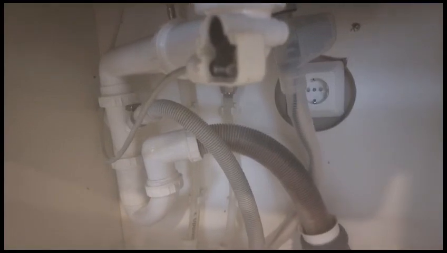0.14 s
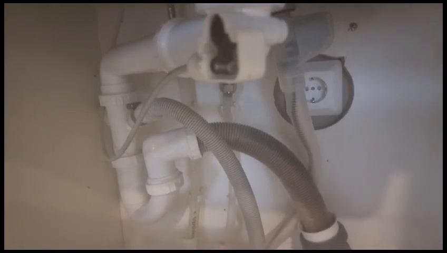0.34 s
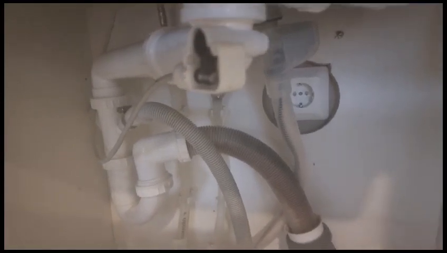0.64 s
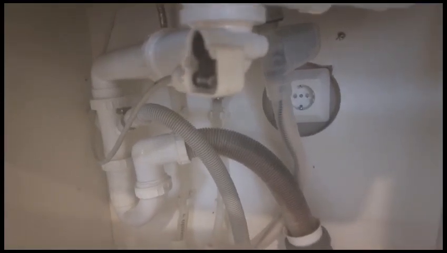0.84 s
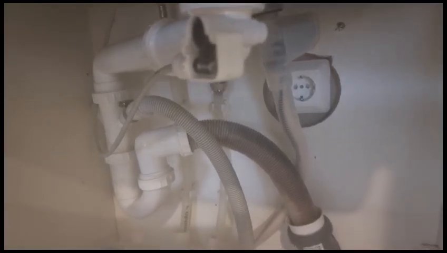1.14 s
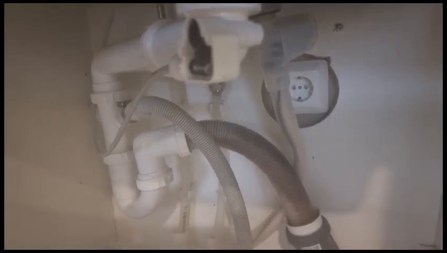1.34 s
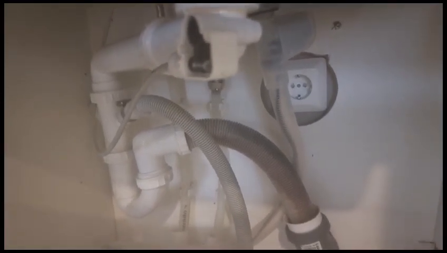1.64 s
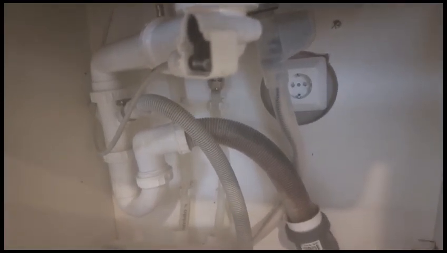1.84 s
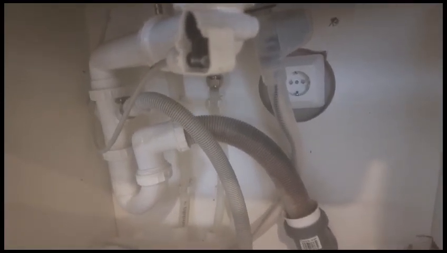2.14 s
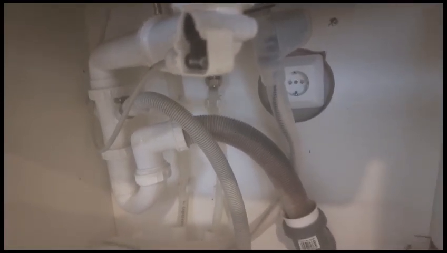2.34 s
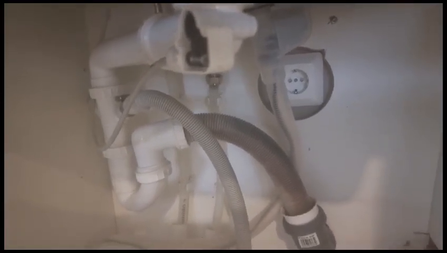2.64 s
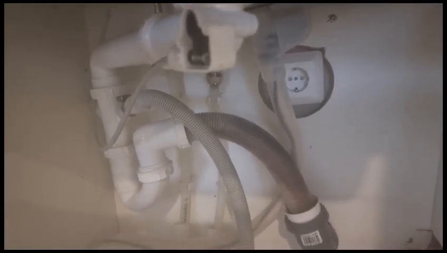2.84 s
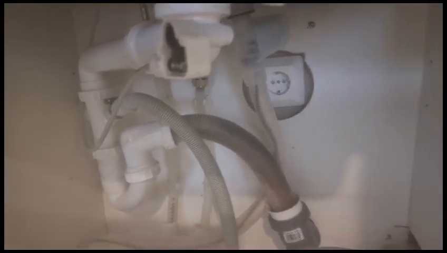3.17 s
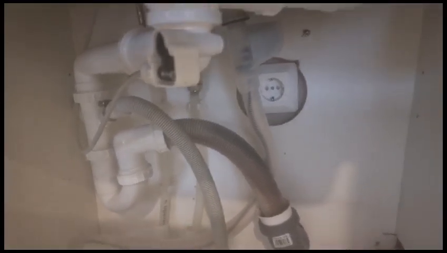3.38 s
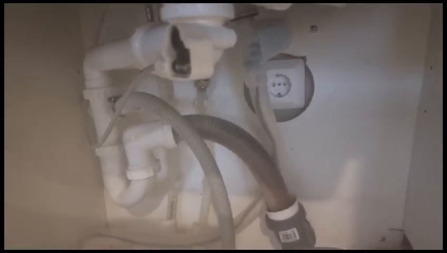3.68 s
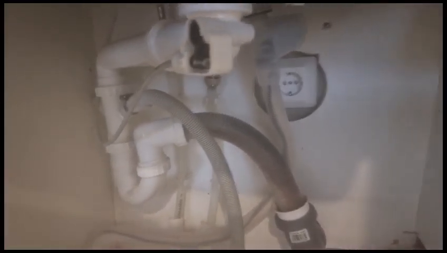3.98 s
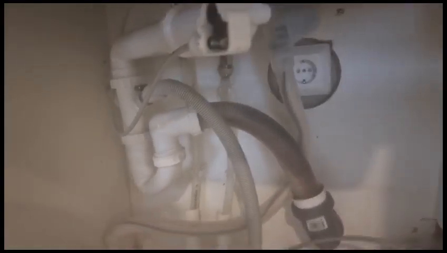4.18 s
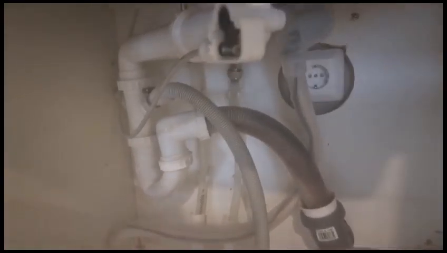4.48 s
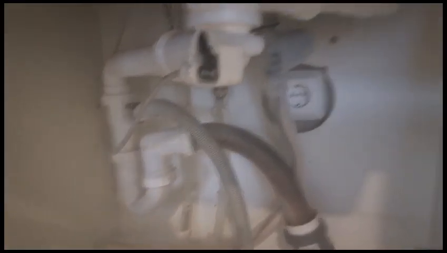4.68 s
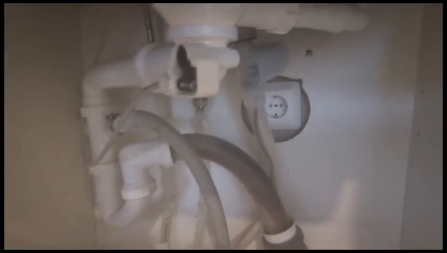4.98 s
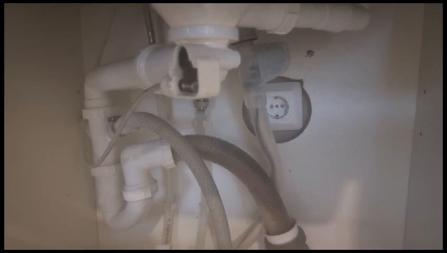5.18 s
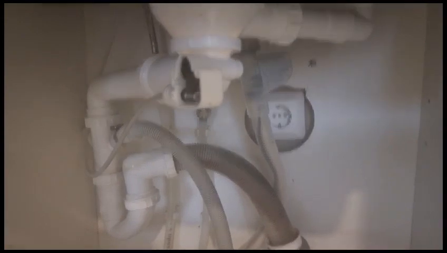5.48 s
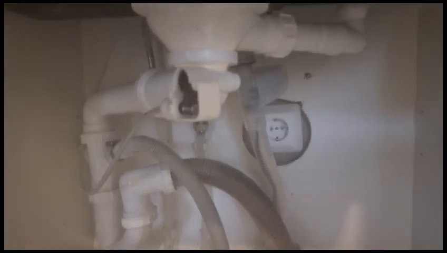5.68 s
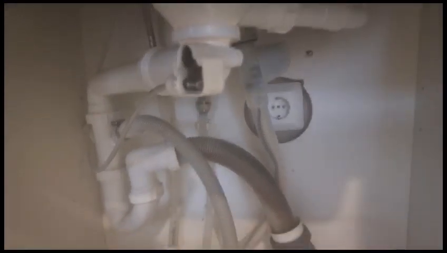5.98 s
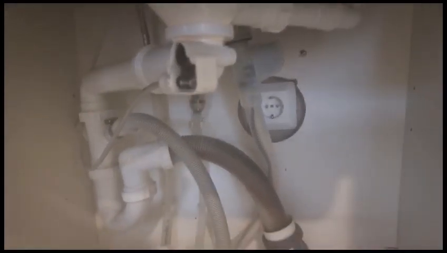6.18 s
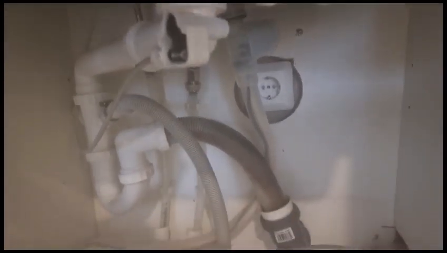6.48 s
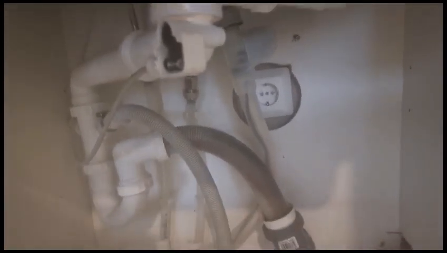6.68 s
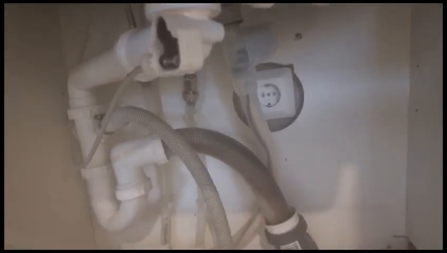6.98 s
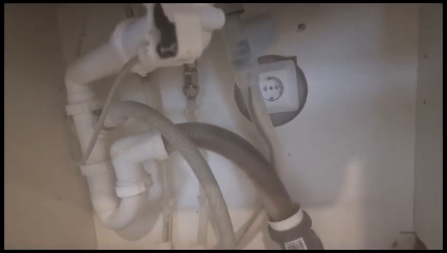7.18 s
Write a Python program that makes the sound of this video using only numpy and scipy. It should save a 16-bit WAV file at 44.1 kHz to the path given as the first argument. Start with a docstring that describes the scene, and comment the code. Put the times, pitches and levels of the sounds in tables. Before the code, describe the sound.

From 0 to about 2.7 seconds, tap water runs steadily: a loud, bright hiss on the basin overhead, with hollow pipe resonance and low rumble, heard closely in stereo inside a boxy cupboard. A raspy slurp begins around 2.6. The stream fades from 2.7 and is practically gone just after 3.0, while five quick, deep gulps throb between 2.8 and 2.95. A swell of run-off follows, gurgling unevenly, with hollow glugs around 3.1, 3.4, 3.8, 4.1 and 4.4, fine trickling and sharp drips on plastic. A dull knock and low gulp come at 4.5. The gurgle ebbs from 4.6; trickling breaks up after 5.7. Small resonant plops sound at 5.87 and 6.07. After 6.4 the pipe is nearly dry, leaving scattered tiny ticks, faint knocks near 6.6, and quiet room tone with a barely audible hum until about 7.3.

```python
"""Tap water rushes and rumbles into a sink and its plastic drain, heard from the cupboard below.
The tap closes, the drain slurps and gulps air, and the run-off gurgles away, thinning to drips and plops.
Rush, rumble, wash and slurp are coloured noise; gulps, bubbles and plops are decaying tones;
droplets, drops and knocks are short noise bursts. Dense reflections add a short, boxy ring."""
import sys
import numpy as np
from scipy import signal
from scipy.fft import rfft, irfft
from scipy.io import wavfile

SR = 44100
rng = np.random.default_rng(int(sys.argv[2]) if len(sys.argv) > 2 else 0)


def pcm_store(signal):
    """Save signal as 16-bit PCM."""
    levels = np.round(np.clip(np.atleast_2d(signal), -1, 1) * 32767)
    wavfile.write(sys.argv[1], SR, levels.astype(np.int16).T)


N = 322812
T = np.arange(N) / SR
FREQS = np.maximum(np.arange(N // 2 + 1) * SR / N, 1)
GRAIN_T = np.arange(4096) / SR  # time within one short sound

# relative colour of the stream on the basin: f/Hz, level/dB
JET_COLOUR = [(40, -47), (150, -26), (230, -10.5), (450, -5), (700, -12), (1050, -12), (1450, -10),
              (2000, -3.5), (3600, -4.5), (5200, -2), (6500, 1.5), (7500, -1.5), (8600, -10), (11500, -8.5),
              (15500, -6.5)]
# relative colour of basin and pipe shaken by falling water: f/Hz, level/dB
RUMBLE_COLOUR = [(22, -56), (42, -29), (58, -11.5), (85, -9), (118, 3.5), (148, -8), (175, -5), (230, -19),
                 (400, -41)]
# relative colour of water rocking in the trap: f/Hz, level/dB
SLOSH_COLOUR = [(25, -30), (42, -11), (62, -8.5), (78, -1.5), (94, 2.5), (116, -2), (145, -13.5),
                (230, -21.5), (400, -40)]
# relative colour of water and bubbles in the pipe: f/Hz, level/dB
GURGLE_COLOUR = [(150, -25), (300, 1), (450, -9.5), (700, -10), (1100, -2.5), (1500, -3.5), (2000, -3),
                 (2800, -7), (4000, -5), (9000, -35)]
# relative colour of droplets at the strainer: f/Hz, level/dB
TRICKLE_COLOUR = [(1000, -55), (2600, -10.5), (3500, -5), (4200, -4.5), (5200, -2.5), (6500, 0.5),
                  (7600, -5), (8700, -14), (10500, -11.5), (12000, -13), (13500, -8), (15500, -14)]
# relative colour of the quiet kitchen: f/Hz, level/dB
ROOM_COLOUR = [(25, -7), (70, 3.5), (160, -10.5), (250, -14.5), (360, -13.5), (500, -19.5), (1000, -37),
               (1600, -30), (2600, -35), (15000, -30.5)]
# relative colour of the sucked air: f/Hz, level/dB
SLURP_COLOUR = [(100, -7), (200, 8), (300, 12), (460, 1), (800, -8), (1500, -37), (4000, -26)]
# relative colour of the knocks: f/Hz, level/dB
KNOCK_COLOUR = [(30, 6), (70, 12), (160, 3), (400, -17), (900, -19), (1700, -15), (3000, -30), (8000, -60)]
# air modes of the drain: f/Hz, width/Hz, strength in jet and slurp/dB, strength in gurgle/dB
PIPE_MODES = [(289.5, 20, 5.5, -15), (370.2, 9, 10.5, 9.5), (536, 42, 7, 9), (763, 69, 8.5, 4),
              (1179, 72, 4.5, -19), (3140, 12, 4.5, -15), (6200, 160, -15, -12)]
# slugs of water that swell the run-off as they pass down the pipe: t/s, lift/dB, half length/s
SLUGS = [(2.97, 13.5, 0.14), (4.056, 7.5, 0.057), (4.68, 5.5, 0.065)]
# air sucked down as the tap closes: t/s, level/dB, half length/s
SLURPS = [(2.583, -41.5, 0.071), (2.792, -45, 0.018), (2.876, -42, 0.021)]
# the largest bubbles: t/s, level/dB, f/Hz
BUBBLES = [(2.595, -28, 470), (2.862, -32.5, 460), (3.115, -33, 1870), (3.118, -28.5, 1060),
           (3.122, -32.5, 540), (3.419, -25.5, 1130), (3.565, -31.5, 1930), (3.72, -37.5, 545),
           (3.794, -30.5, 1820), (4.082, -30, 903), (4.318, -31, 1060), (4.382, -27, 960),
           (4.582, -34.5, 970), (4.629, -34, 1700), (4.675, -32.5, 880), (5.005, -38.5, 1900),
           (5.226, -39, 548), (6.632, -50, 1600)]
# air gulped through the trap: t/s, level/dB, f/Hz
GULPS = [(2.793, -16.5, 90.5), (2.828, -18.5, 90), (2.867, -18, 97), (2.900, -21, 102), (2.942, -25, 95),
         (4.502, -38, 64.5), (6.19, -46, 97), (6.583, -53, 122), (6.633, -48.5, 81.4), (6.98, -44.5, 102)]
# drops that stand out as they slap the plastic: t/s, level/dB, brightest f/Hz
DROPS = [(3.2271, -27, 6600), (3.3182, -24, 6350), (3.341, -26.5, 4960), (3.476, -23.5, 5300),
         (3.5663, -28, 6450), (3.941, -30.5, 5640), (4.295, -29.5, 4900), (4.38, -35, 4260),
         (4.6835, -21, 6000), (5.029, -32, 5150), (5.1565, -37, 6700), (5.783, -36, 5890),
         (5.87, -36, 5800), (5.893, -37, 7000), (6.008, -45, 3740), (6.075, -41, 7300),
         (6.097, -37.5, 5800), (6.136, -40, 6160), (6.177, -36, 6400), (6.196, -38, 4630),
         (6.206, -38, 6300), (6.3121, -40, 6300), (6.413, -49, 8500), (6.51, -45, 7500),
         (6.584, -41.5, 3670), (6.647, -33.5, 6160), (6.6967, -44, 7760), (6.754, -46, 12000),
         (6.86, -51, 9500), (6.904, -47, 8500), (6.9516, -50, 12500), (6.984, -38.5, 6550),
         (7.047, -46.5, 6940), (7.1427, -47.5, 6000), (7.182, -45, 7800), (7.201, -39.5, 5290)]
# the pipe knocks as water shifts in it: t/s, level/dB
KNOCKS = [(4.505, -33), (6.588, -46), (6.633, -38)]
# heavy drips into the trap: t/s, level/dB
PLOPS = [(5.868, -36.5), (6.068, -37.5)]
# ringing modes of the hollow trap: f/Hz, relative level/dB, t60/s
TRAP_MODES = [(536, -5, 0.098), (603, 4.5, 0.06), (740, 0, 0.043), (993, 1, 0.073), (1396, -18, 0.6),
              (1455, 2, 0.057), (1770, -22, 0.043), (2420, -12, .1)]
# difference in colour between the two listening ports: f/Hz, left minus right level/dB
PORTS = [(60, -2), (380, -1), (700, -0.5), (1290, -5.5), (2380, -1.8), (4400, 6), (8120, -3), (15000, 1)]

# the tap runs steadily, is turned down, then shuts and the last of the stream falls
JET_DB, TAP_TURN_S, TURN_DB_PER_S = -27.7, 2.712, 41
TAP_SHUT_S, SHUT_DB_PER_S = 2.976, 75
# the pipe runs full, ebbs, then runs dry
EBB_S, EBB_DB_PER_S, DRY_S, DRY_DB_PER_S = 4.63, 11.5, 6.38, 107
# the basin's last water thins slowly, then breaks up into a dribble
TRICKLE_DB, THIN_DB_PER_S, BREAK_S, BREAK_DB_PER_S, DRIBBLE_DB = -45, 1.2, 5.7, 38, -64


def amp(db):
    """Decibels to gain."""
    return 10 ** (np.asarray(db) / 20)


def unit(x):
    """Scale to an rms of one."""
    return x / np.sqrt(np.mean(x ** 2))


def shape(points):
    """Gain at every frequency, drawn through (Hz, dB) points on a log pitch scale."""
    hz, db = np.transpose(points)
    return amp(np.interp(np.log(FREQS), np.log(hz), db))


def colour(x, gain):
    """Filter by a frequency response, then scale to an rms of one."""
    return unit(irfft(rfft(x) * gain, N))


def resonance(hz, width):
    """Response of one damped mode."""
    return 1 / (1 + 1j * (FREQS ** 2 - hz ** 2) / (FREQS * width))


def pipe(axis):
    """The drain's air modes add their power to a flat response; axis picks the strength column."""
    power = sum(np.abs(amp(row[axis]) * resonance(row[0], row[1])) ** 2 for row in PIPE_MODES)
    return np.sqrt(1 + 2 * power)


def walk(rate):
    """Smooth random wander with an rms of one, mostly slower than rate in Hz."""
    return colour(rng.standard_normal(N), 1 / (1 + (FREQS / rate) ** 4))


def air(apart_hz):
    """Stereo noise, nearly alike left and right far below apart_hz."""
    mid, side = rng.standard_normal((2, N))
    side = irfft(rfft(side) * np.minimum(0.046 + FREQS / apart_hz, 1), N)
    return np.array([mid + side, mid - side])


def add(track, s, sound):
    """Mix a short sound in at time s."""
    start = int(np.clip(s * SR, 0, N - 1))
    track[start:start + len(sound)] += sound[:N - start]


def cupboard(x, wet_db, t60, lag=0.00043):
    """Direct sound, lag seconds late at the left port, plus dense reflections that differ for each port."""
    t = np.arange(SR // 4) / SR
    tail = rng.standard_normal((2, len(t))) * amp(-60 * t / t60) * (1 - np.exp(-t / 0.0021))
    tail *= amp(wet_db) / np.sqrt(np.sum(tail ** 2, axis=1, keepdims=True))
    left = np.pad(x, (int(lag * SR), 0))[:N]
    return np.array([left, x]) + signal.fftconvolve(x[None], tail, axes=1)[:, :N]


def bubble(hz, cycles, glide):
    """A pinched-off bubble rings for a few cycles and rises in pitch, peak one."""
    age = GRAIN_T * hz / cycles
    tone = np.sin(2 * np.pi * hz * GRAIN_T * (1 + glide * np.minimum(age, 4)))
    ring = tone * np.exp(-age) * (1 - np.exp(-2 * age))
    return ring / np.abs(ring).max()


def splash(hz, sharpness, decay):
    """A decaying burst of spray centred on one pitch, peak one."""
    burst = rng.standard_normal(len(GRAIN_T)) * np.exp(-GRAIN_T / decay)
    band = signal.iirpeak(hz, sharpness, SR)
    burst = signal.lfilter(*band, signal.lfilter(*band, burst))
    return burst / np.abs(burst).max()


def since(s):
    """Seconds gone by since time s; zero before it."""
    return np.maximum(T - s, 0)


def swell(s, half_length):
    """A smooth rise and fall around time s, peak one."""
    return np.exp(-((T - s) / half_length) ** 2)


def slugs():
    """Lift in dB from the slugs of water passing."""
    return sum(db * swell(s, half_length) for s, db, half_length in SLUGS)


def pipe_flow(empty_db=-31):
    """Flow down the pipe in dB below full: it holds, ebbs, then drops to a last seep."""
    return np.maximum(-EBB_DB_PER_S * since(EBB_S) - DRY_DB_PER_S * since(DRY_S), empty_db)


def strainer_flow(running_db=5):
    """Trickle level in dB: stronger under the running tap, then thinning until it breaks into a dribble."""
    thinning = TRICKLE_DB - THIN_DB_PER_S * since(TAP_SHUT_S) - BREAK_DB_PER_S * since(BREAK_S)
    return np.maximum(thinning, DRIBBLE_DB) + running_db * amp(-SHUT_DB_PER_S * since(TAP_SHUT_S))


def scatter(count, level, low_hz, high_hz, spread_db):
    """Random (s, dB, Hz) events after the tap shuts, up to spread_db below a level curve."""
    when, size, pitch = rng.random((count, 3)).T
    s = TAP_SHUT_S + (T[-1] - TAP_SHUT_S) * when
    db = np.interp(s, T, level) - spread_db * size
    return list(zip(s, db, low_hz * (high_hz / low_hz) ** pitch))


def jet(flutter_db=0.52, spray_db=0.44):
    """The stream hisses on the basin overhead and sounds the drain's modes, fading as the tap closes."""
    db = JET_DB - TURN_DB_PER_S * since(TAP_TURN_S) - SHUT_DB_PER_S * since(TAP_SHUT_S)
    hiss = air(1600) + 0.5 * cupboard(rng.standard_normal(N), wet_db=3, t60=0.14, lag=0)
    hiss = hiss * amp(flutter_db * walk(14) + spray_db * walk(150))
    return colour(hiss, shape(JET_COLOUR) * pipe(axis=2)) * amp(db)


def rumble(shut_s=2.78, fade_s=0.053, flowing_db=-38.5, slosh_db=-53, follow=0.78, still_db=-66):
    """Falling water shakes basin and pipe; then it sloshes lower in the trap, calming as the pipe empties."""
    full = np.clip((shut_s - T) / fade_s, 0, 1)
    flowing = colour(air(2000), shape(RUMBLE_COLOUR)) * amp(flowing_db)
    slosh_level = np.maximum(slosh_db + follow * pipe_flow() + slugs(), still_db)
    sloshing = colour(air(540), shape(SLOSH_COLOUR)) * amp(slosh_level)
    return full * flowing + (1 - full) * sloshing


def gurgle(count=3000, spread_db=3, bubbles_db=-1, wash_db=-4, surge_db=3, full_db=-49.5, slug_share=0.29):
    """A swarm of small bubbles over the wash of water down the pipe wall, coming in surges."""
    swarm = np.zeros(N)
    for when, pitch, size in rng.random((count, 3)):
        gain = amp(-spread_db * np.log(size + 0.019))
        add(swarm, when * N / SR, gain * bubble(450 * 7 ** pitch, cycles=2, glide=0.039))
    swarm = unit(cupboard(swarm, wet_db=1.5, t60=0.14))
    body = shape(GURGLE_COLOUR) * pipe(axis=3)
    # small bubbles ring more briefly, so the swarm is tilted upwards to give them their share
    bubbles = amp(bubbles_db) * colour(swarm, body * np.sqrt(FREQS))
    wash = amp(wash_db) * colour(air(2100), body)
    return (bubbles + wash) * amp(full_db + pipe_flow() + slug_share * slugs() + surge_db * walk(19.4))


def trickle(count=3200, spread_db=5.5, fizz_db=-6, full_db=-49, thin_lift_db=9, thin_rise_hz=2500, spurt_db=3):
    """Droplets spatter at the strainer; as the flow thins they come fewer, finer and in spurts."""
    db = strainer_flow()
    flow = np.clip(amp(db - full_db), 0.1, 1)
    spatter = np.zeros(N)
    for when, pitch, size, chance in rng.random((count, 4)):
        here = flow[int(when * N)]
        if chance >= here:
            continue
        lowest_hz = 2600 + thin_rise_hz * (1 - here)
        droplet = splash(lowest_hz + (14700 - lowest_hz) * pitch, sharpness=1.5, decay=0.00038)
        # a thin flow favours the high droplets
        gain_db = -spread_db * np.log(size + 0.03) + thin_lift_db * (0.5 - here) * pitch
        add(spatter, when * N / SR, amp(gain_db) / np.sqrt(here) * droplet)
    body = shape(TRICKLE_COLOUR)
    splashes = colour(cupboard(spatter, wet_db=7, t60=0.063), body)
    fizz = amp(fizz_db) * colour(air(1200), body)
    return (splashes + fizz) * amp(db + spurt_db * (1 - flow) * walk(16))


def room(room_db=-66, hum_hz=361, hum_db=-80, waver_hz=3):
    """Quiet kitchen noise with a faint hum whose pitch wavers."""
    hum = np.sqrt(2) * np.sin(2 * np.pi * np.cumsum(hum_hz + waver_hz * walk(9.9)) / SR)
    return amp(room_db) * colour(air(830), shape(ROOM_COLOUR)) + amp(hum_db) * hum


def slurp(ragged_db=3):
    """Air dragged down with the last full flow rasps in the pipe's low modes."""
    suction = sum(amp(db) * swell(s, half_length) for s, db, half_length in SLURPS)
    rasp = air(1000) * amp(ragged_db * walk(54))
    return colour(rasp, shape(SLURP_COLOUR) * pipe(axis=2)) * suction


def large_bubbles(bubble_db=-3, burst_db=-10, small_db=-35):
    """Single glugs that stand out of the gurgle, each with a wet burst as the film breaks."""
    out = np.zeros(N)
    smaller = scatter(count=44, level=small_db + pipe_flow(), low_hz=522, high_hz=2640, spread_db=6)
    for s, db, hz in BUBBLES + smaller:
        glug = bubble(hz, cycles=3, glide=0.0075)
        burst = splash(1.15 * hz, sharpness=1.2, decay=0.006)
        add(out, s, amp(db + bubble_db) * glug + amp(db + burst_db) * burst)
    return cupboard(out, wet_db=-3.5, t60=0.073)


def gulps(swell_s=0.013, decay_s=0.0077, lowest_hz=42):
    """Slugs of water swing on the air in the trap: short, nearly pure low throbs."""
    out, t = np.zeros(N), np.arange(SR // 5) / SR
    rise = np.sin(np.pi / 2 * np.minimum(t / swell_s, 1)) ** 2
    envelope = rise / np.cosh(np.maximum(t - swell_s, 0) / decay_s)
    for s, db, hz in GULPS:
        add(out, s, -amp(db) * envelope * np.sin(2 * np.pi * hz * t))
    # cut the deepest bass but keep the overall level
    return colour(out, 1 / (1 + (lowest_hz / FREQS) ** 6)) * out.std()


def drops(spray_db=-50, spray_follow=0.42, ring_db=-3, small_db=-35):
    """Drops slap the plastic: a sharp tick, a brief pitched ring and a crack of spray; lighter ones at random."""
    out = np.zeros(N)
    light_level = small_db + strainer_flow() - TRICKLE_DB
    light = scatter(count=48, level=light_level, low_hz=4140, high_hz=10100, spread_db=4)
    for s, db, hz in DROPS + light:
        tick = splash(hz, sharpness=1.9, decay=0.0012)
        tick += amp(ring_db) * splash(hz, sharpness=5.9, decay=0.0024)
        crack = splash(14700, sharpness=1.6, decay=0.0023)
        crack_db = spray_db + spray_follow * (db - small_db)
        add(out, s, amp(db) * tick / np.abs(tick).max() + amp(crack_db) * crack)
    return cupboard(out, wet_db=0.5, t60=0.1)


def knocks(decay=0.004):
    """Short dull pushes on the plastic, decaying noise scaled so that the strongest has its table level."""
    out = np.zeros(N)
    for s, db in KNOCKS:
        add(out, s, amp(db) * rng.standard_normal(len(GRAIN_T)) * np.exp(-GRAIN_T / decay))
    dull = colour(cupboard(out, wet_db=-9, t60=0.12), shape(KNOCK_COLOUR))
    return dull / np.abs(dull).max() * amp(max(db for s, db in KNOCKS))


def plops(plop_db=-1, splash_db=-4):
    """Heavy drips splash into the trap and ring its hollow."""
    out, t = np.zeros(N), np.arange(SR // 3) / SR
    for s, db in PLOPS:
        ring = np.zeros(len(t))
        for hz, mode_db, t60 in TRAP_MODES:
            ring += amp(mode_db - 60 * t / t60) * np.sin(2 * np.pi * (hz * t + rng.random()))
        ring *= 1 - np.exp(-t / 0.0028)  # soft onset
        add(out, s, amp(db + plop_db) * ring / np.abs(ring).max())
        add(out, s, amp(db + splash_db) * splash(1050, sharpness=1.3, decay=0.007))
    return cupboard(out, wet_db=-8.5, t60=0.065)


def scene(lean_db=1):
    """The full flow, then the run-off, which lies a little to the right."""
    runoff = gurgle() + trickle() + large_bubbles() + drops() + plops()
    runoff = runoff * amp([[-lean_db], [lean_db]])
    return jet() + rumble() + room() + slurp() + gulps() + knocks() + runoff


def record(dry, top_hz=15850):
    """Left and right ports share their colour difference; the top is cut steeply above top_hz."""
    lean = np.sqrt(shape(PORTS))
    heard = irfft(rfft(dry) * np.array([lean, 1 / lean]), N)
    top_cut = signal.ellip(10, 0.2, 70, top_hz, fs=SR, output="sos")
    return signal.sosfilt(top_cut, heard)


dry = scene()
out = record(dry)
pcm_store(out)
```